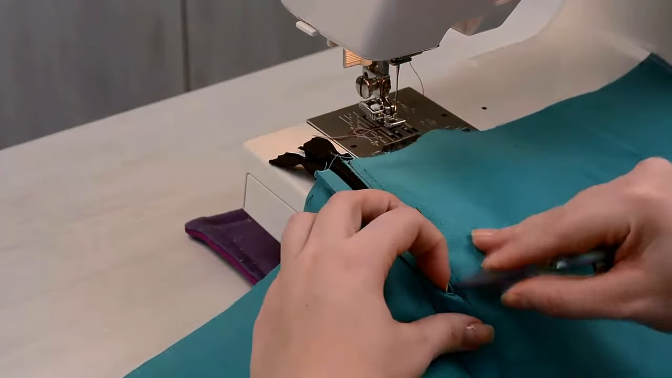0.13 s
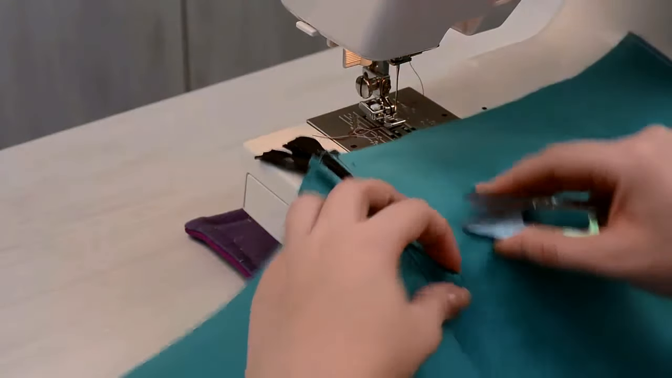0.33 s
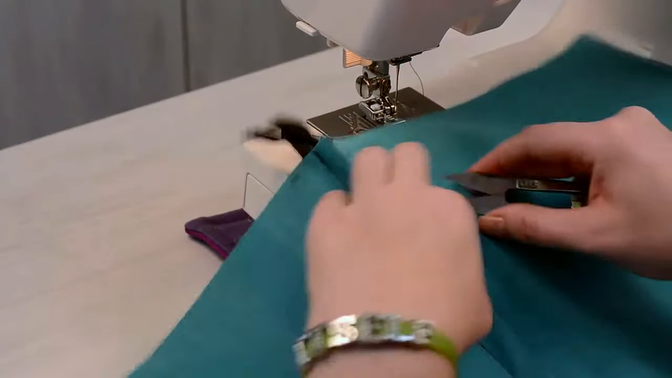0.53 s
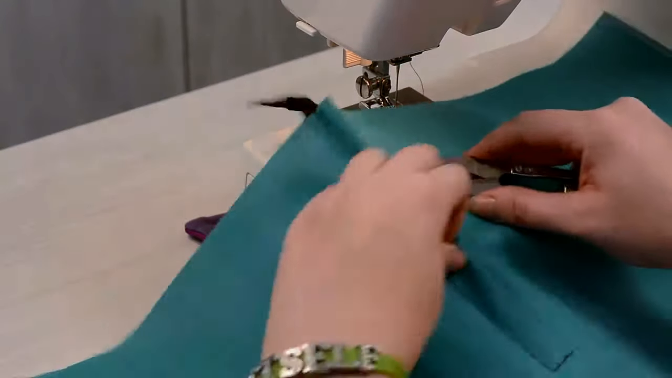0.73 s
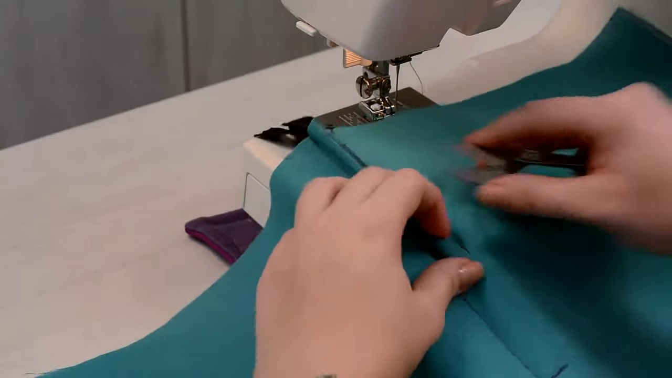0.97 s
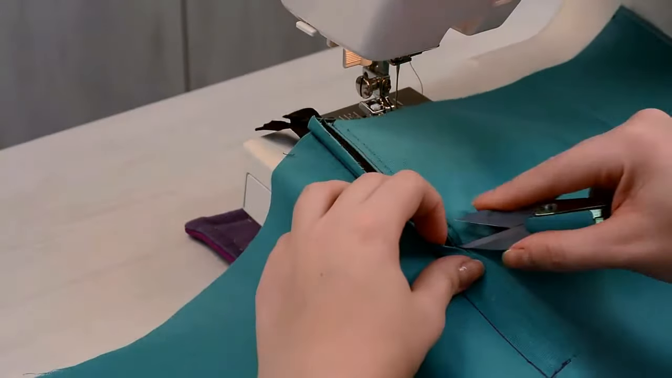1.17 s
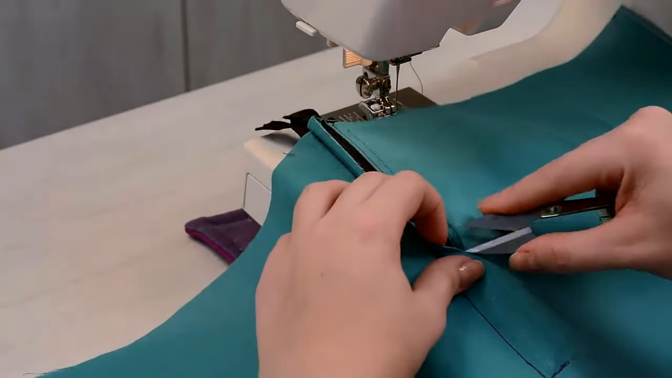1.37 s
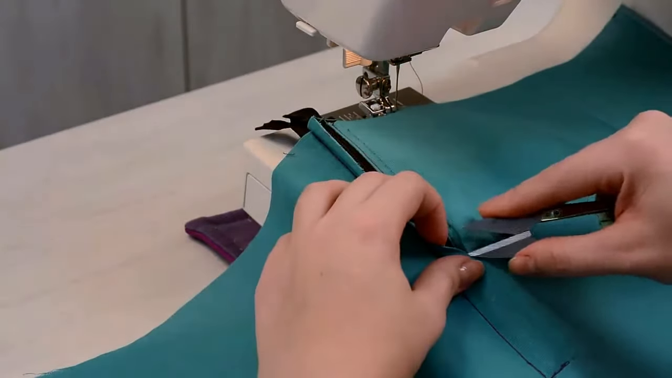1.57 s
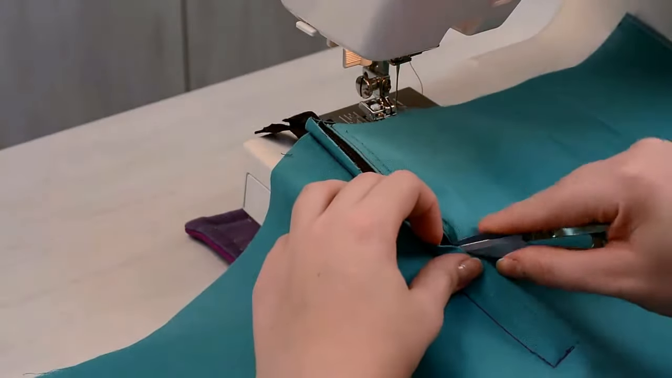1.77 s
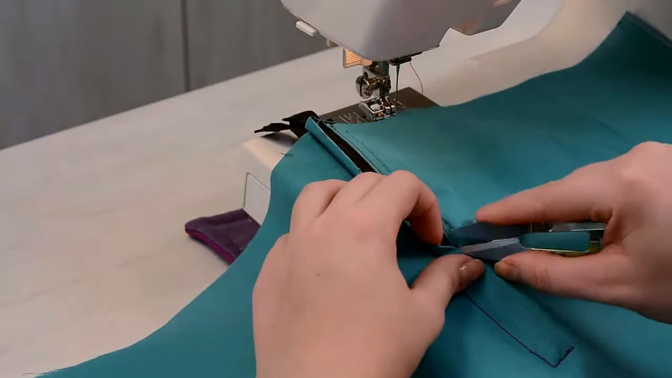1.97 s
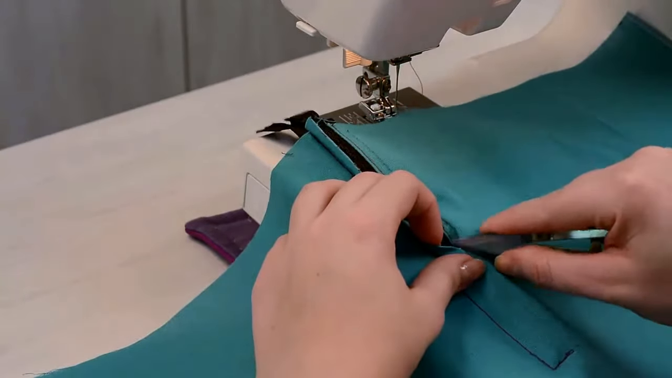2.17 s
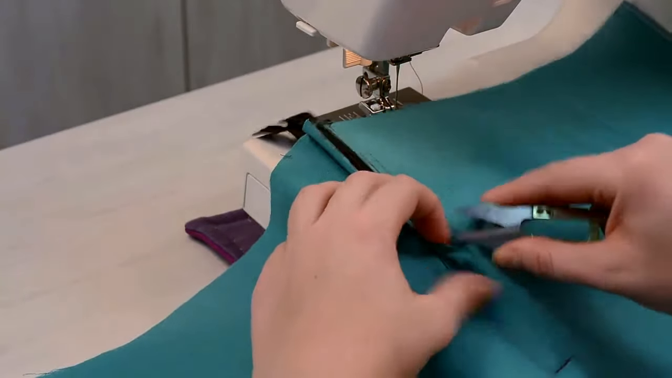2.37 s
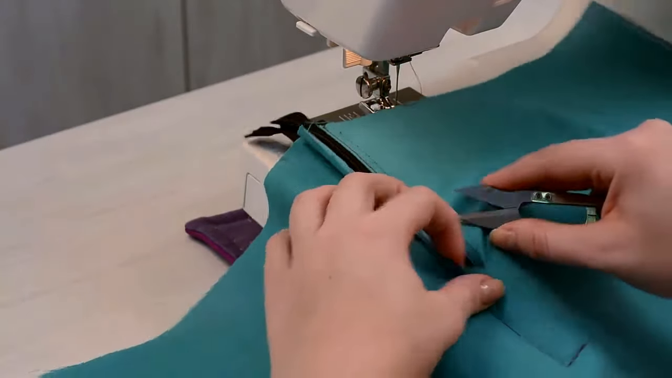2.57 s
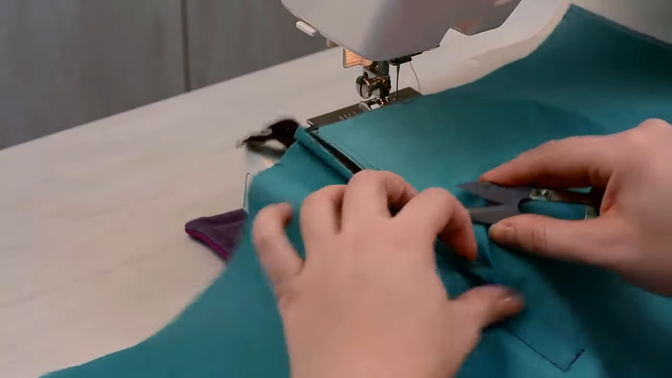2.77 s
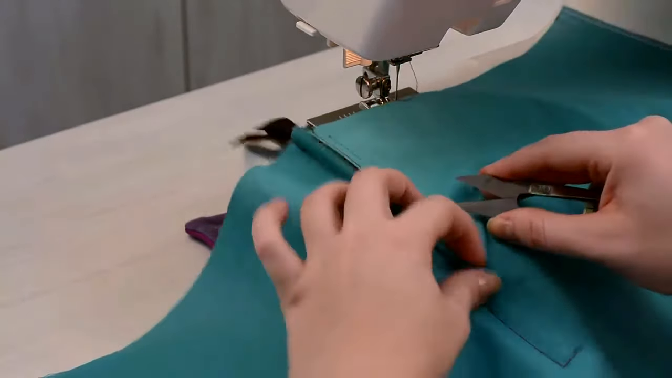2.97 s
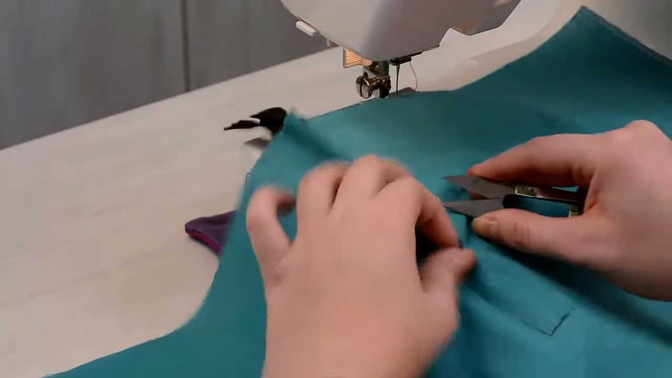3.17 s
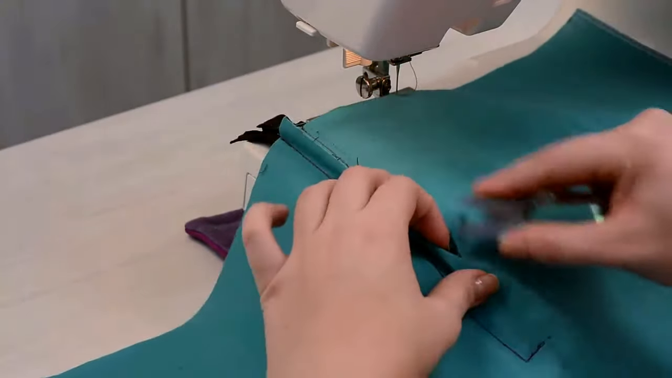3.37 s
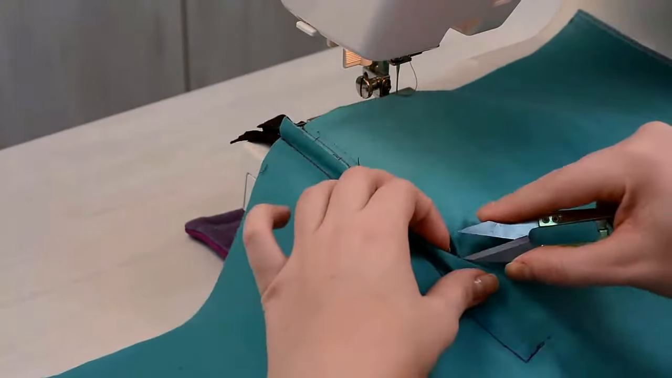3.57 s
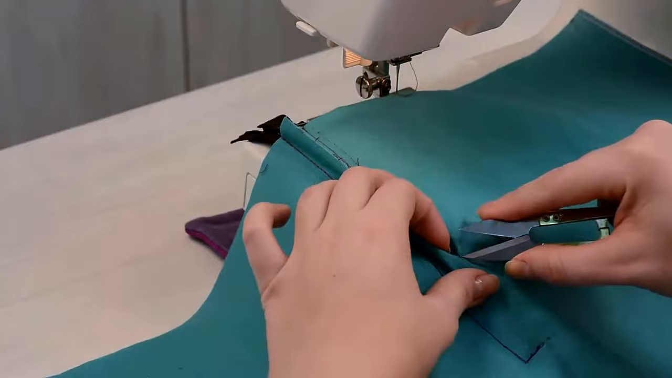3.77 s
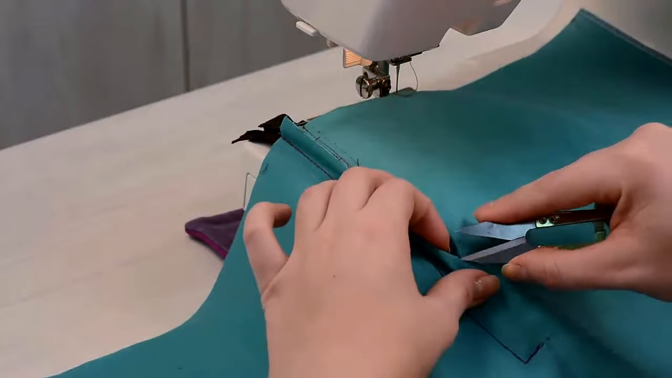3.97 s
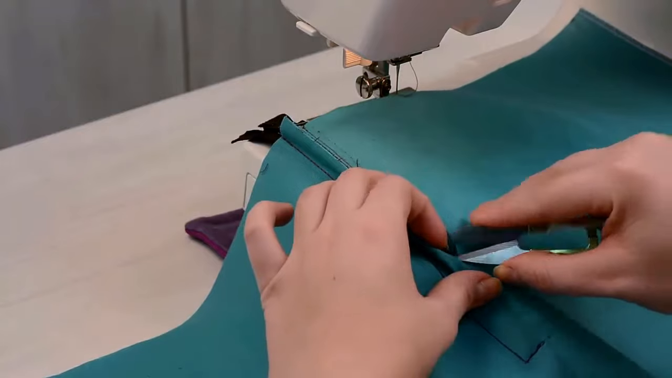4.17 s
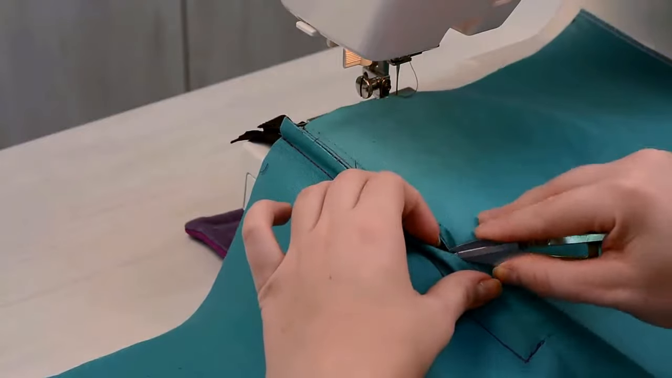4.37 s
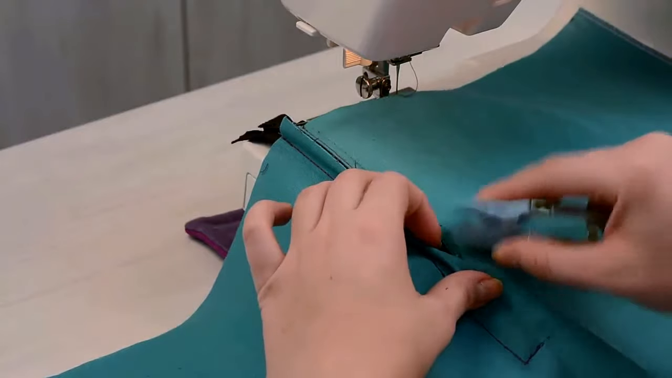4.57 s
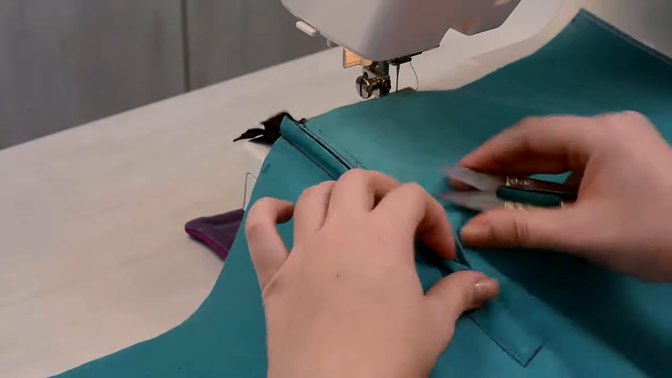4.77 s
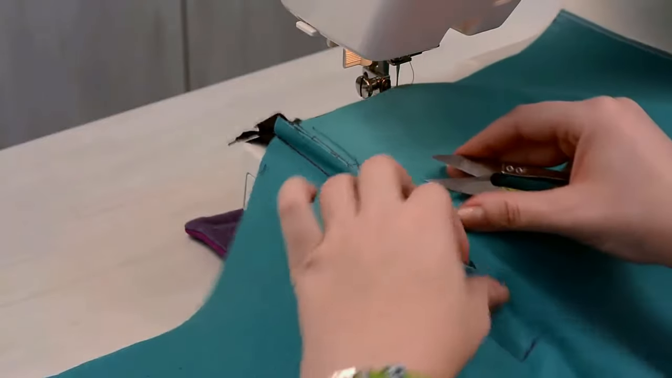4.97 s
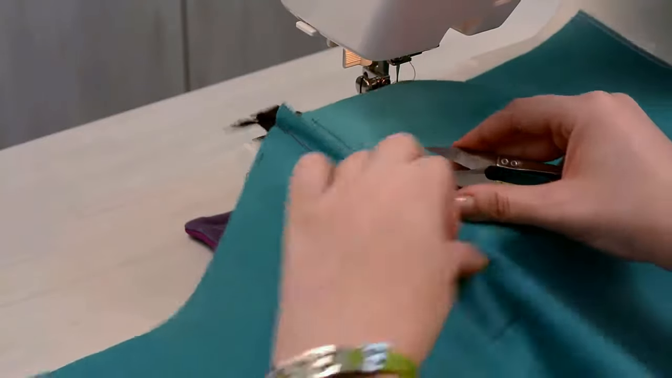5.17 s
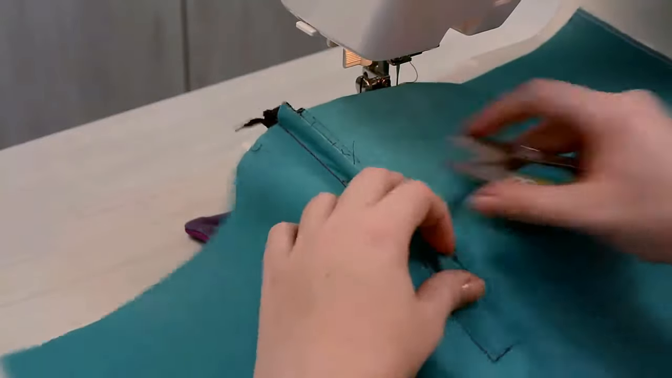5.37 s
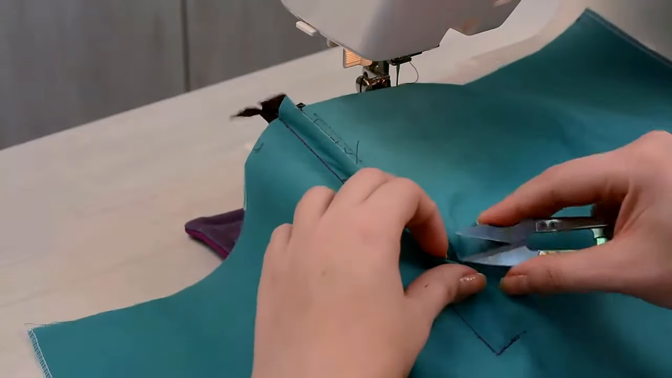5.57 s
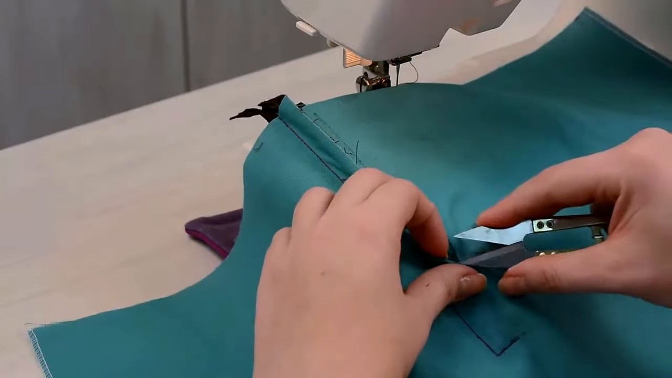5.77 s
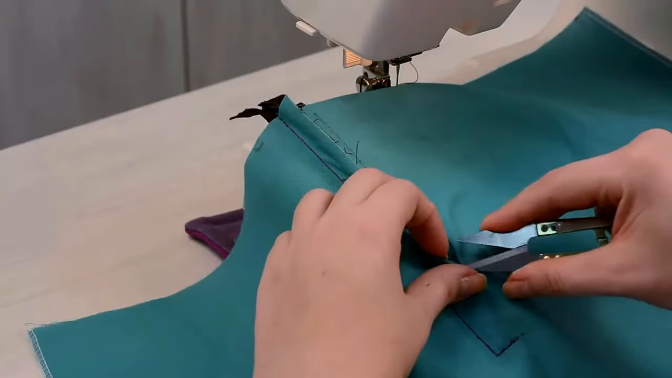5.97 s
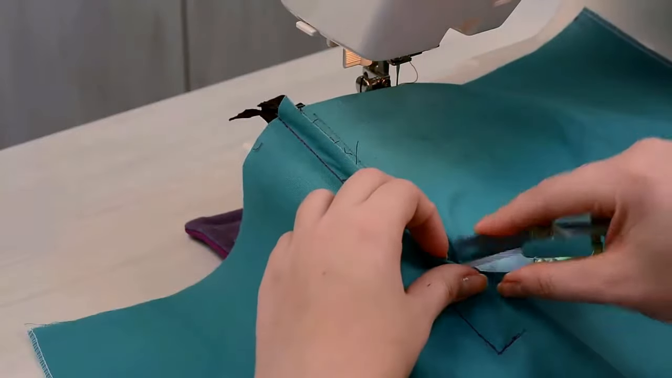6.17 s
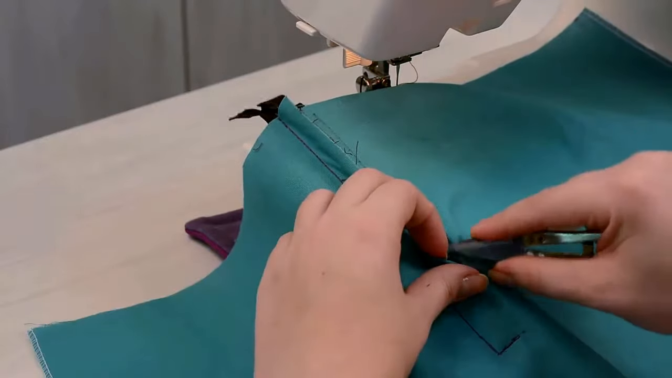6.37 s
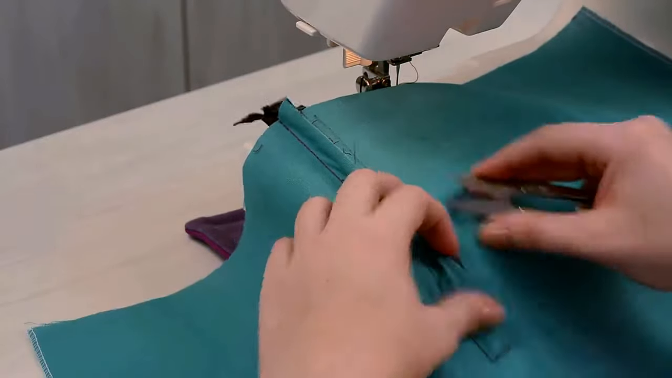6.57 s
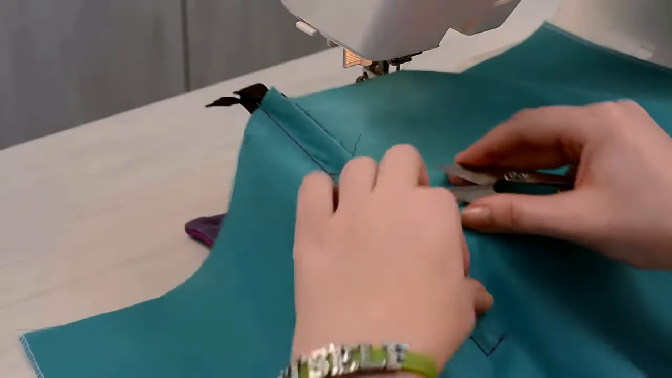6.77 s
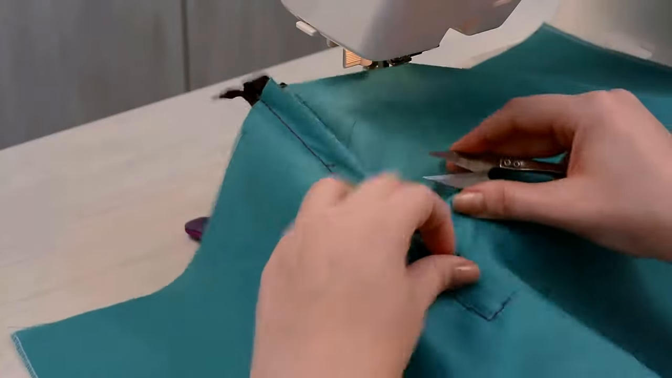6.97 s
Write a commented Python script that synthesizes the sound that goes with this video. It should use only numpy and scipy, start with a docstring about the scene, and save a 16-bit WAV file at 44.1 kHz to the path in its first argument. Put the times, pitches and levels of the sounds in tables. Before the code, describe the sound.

Fabric rustles and slides over a table with soft finger knocks, broken by a few sharp metallic clicks of little spring snips.

```python
"""At a sewing table, the microphone close to a pair of spring thread snips, everything straight ahead.
The steel blades scrape shut and clack, then rasp open with sharp catches, ringing with their handle.
Fingers and cloth drag, scuff and knock on the hollow table top, and the weave rustles and swishes.
Behind them lie short room reflections, a low murmur, faint mains hum and microphone hiss."""
import sys
import numpy as np
from scipy import signal
from scipy.fft import rfft, irfft
from scipy.io import wavfile
from scipy.ndimage import uniform_filter1d

SR = 44100
rng = np.random.default_rng(int(sys.argv[2]) if len(sys.argv) > 2 else 0)


def unload_audio(sound):
    """Save the sound as a 16-bit wav file, at the path given as the first command line argument."""
    columns = np.transpose(np.atleast_2d(sound))
    # keep every value between -1 and 1, then stretch to whole-number steps
    steps = np.round(np.clip(columns, -1, 1) * 32767)
    wavfile.write(sys.argv[1], SR, steps.astype(np.int16))


N = 310023
T = np.arange(N) / SR

# Modes of the hollow table top. Each row: frequency in Hz, width in Hz, gain in dB.
TOP_MODES = [(298.4, 24, 1.5), (340.4, 50, 4), (460, 72, -2), (536, 51, 3.5), (614, 22, 0.5), (816, 45, -2),
             (1356, 59, -21), (1524, 194, -15), (1846, 220, -19.5), (2296, 260, -19.5), (2870, 1800, -33.5)]
UPPER_MODES = [mode for mode in TOP_MODES if mode[0] >= 1000]


def undb(db):
    """Decibels to gain."""
    return 10 ** (np.asarray(db) / 20)


def unit(x):
    """Scale to rms 1."""
    return x / np.sqrt(np.mean(x ** 2))


def ring(x, modes):
    """Sum of two-pole resonances, each given as centre in Hz, width in Hz, gain in dB."""
    return sum(undb(db) * signal.lfilter(*signal.iirpeak(hz, hz / width, fs=SR), x)
               for hz, width, db in modes)


def spectrum(points):
    """Gain of a curve of (Hz, dB) points on the bins of the whole sound."""
    hz, db = np.transpose(points)
    return undb(np.interp(np.log(np.fft.rfftfreq(N, 1 / SR) + 1), np.log(hz), db))


def grains(spread_db, size=N):
    """Noise whose samples have heavy-tailed sizes: a dense crackle."""
    return unit(rng.standard_normal(size) * undb(spread_db * rng.exponential(size=size)))


def wander(rate_hz):
    """Glides between random levels, rate_hz of them a second; spread near 1."""
    hold = int(SR / rate_hz)
    return uniform_filter1d(np.repeat(rng.standard_normal(N // hold + 1), hold), hold)[:N]


def add(out, start_s, sound, peak_db):
    """Mix a short sound in with the given peak."""
    i = int(start_s * SR)
    part = sound[:N - i]
    out[i:i + len(part)] += part * undb(peak_db) / np.abs(sound).max()


def noise_floor():
    """Room murmur and mains hum in the centre; microphone hiss above, wider toward the treble."""
    # Murmur and hiss. Each row: frequency in Hz, relative density in dB.
    floor_curve = [(12, -36), (20, 2.5), (163, -2.5), (410, -8), (459, -18), (542, -11), (1060, -16),
                   (1610, -14.5), (1860, -15.5), (2260, -16.5), (4060, -18), (14700, -22), (16000, -25.5)]
    # The part that differs between left and right. Each row: frequency in Hz, share in dB.
    side_curve = [(30, -28), (60, -29), (110, -24), (200, -24), (380, -18.5), (700, -11), (1290, -8.5),
                  (2380, -10), (4400, -6), (8120, -4), (15000, -1)]
    floor_db, hum_db, hum_hz = -49.5, -66, 51.5
    mid, side = rfft(rng.standard_normal((2, N))) * spectrum(floor_curve)
    mid, side = irfft(mid, N), irfft(side * spectrum(side_curve), N)
    hum = undb(hum_db) * np.sqrt(2) * np.sin(2 * np.pi * hum_hz * T)
    return undb(floor_db) * (mid + side * np.array([[1], [-1]])) / np.std(mid) + hum


def room(x):
    """A short dull tail of reflections, almost the same left and right."""
    t60_s, mid_db, side_db = 0.1, -20.2, -59.6
    t = T[:int(.2 * SR)]
    tails = rng.standard_normal((2, len(t))) * np.exp(-np.log(1000) * t / t60_s) * (t > .003)
    tails = signal.lfilter([1], [1, -.5], tails)
    mid, side = tails / np.sqrt(np.sum(tails ** 2, axis=1, keepdims=True))
    response = undb(mid_db) * mid + undb(side_db) * side * np.array([[1], [-1]])
    return signal.fftconvolve(x[None], response, axes=1)[:, :N]


def weave(grain_db, flicker_db, flicker_hz):
    """Fine crackle of fibres as a spectrum; each third-octave flickers alone, shifting the colour."""
    # Colour of the cloth. Each row: frequency in Hz, gain in dB.
    cloth_curve = [(590, -6), (1000, -16), (1150, -14), (2330, -10), (3890, -13), (4900, -5), (5900, -9.5),
                   (6860, -5.5), (13600, -2.5), (16000, 2)]
    fibres = grains(grain_db) * undb(flicker_db * wander(flicker_hz))
    centres_hz = 1000 * 2 ** np.arange(0, 4.1, 1 / 3)
    bands = sum(undb(4.3 * wander(25)) * ring(fibres, [(hz, hz / 5, 0)]) for hz in centres_hz)
    return rfft(bands) * spectrum(cloth_curve)


def spot_modes(spot_hz, focus_db):
    """Low table modes as excited at one spot: those near its pitch are favoured."""
    return [(hz, width, db - focus_db * np.log2(hz / spot_hz) ** 2)
            for hz, width, db in TOP_MODES if hz < 1000]


def soft_touch(x):
    """Flesh and cloth pass little treble into the wood, and the small top radiates little bass."""
    return signal.sosfilt(signal.butter(2, [240., 900.], "band", fs=SR, output="sos"), x)


def finger_rubs():
    """Decibels by which fingers rubbing along the table lift its rumble."""
    # Each row: start in seconds, length in seconds, lift in dB.
    rubs = [(0.187, 0.099, 2), (.72, 0.091, 2), (.93, .07, 8), (1.09, 0.042, 6), (1.33, 0.053, 8.5),
            (1.536, 0.19, 6), (1.884, .06, 9), (1.968, 0.13, 12), (2.36, 0.092, 7), (3.382, 0.12, 6.5),
            (4.076, .14, 8), (4.6, 0.12, 5), (4.78, .06, 9), (5.098, 0.045, 6.5), (5.24, 0.057, 5),
            (5.842, 0.069, 7.5), (6.076, 0.14, 5.5), (6.767, 0.03, 5)]
    edge_s = 0.017
    return sum(db * np.clip(np.minimum(T - s, s + length_s - T) / edge_s, 0, 1)
               for s, length_s, db in rubs)


def cloth_drag():
    """Stick-slip of cloth shakes the table in short throbs and rustles in fine grains."""
    # Hands resting and shifting. Each row: time in seconds, rumble before rubs in dB, rustle in dB.
    hand_levels = [(0.0, -46, -49), (0.23, -43, -48.5), (1.35, -54, -53.5), (1.57, -51, -54),
                   (1.74, -56, -53.5), (2.29, -50.5, -52), (2.54, -45, -48), (2.88, -49.5, -47.5),
                   (3.68, -58.5, -54.5), (4.31, -49, -53), (4.6, -53.5, -52.5), (4.93, -47, -46.5),
                   (5.33, -47, -52.5), (5.52, -54, -54.5), (5.91, -53, -53), (6.48, -48.5, -51.5),
                   (6.62, -47, -48.5), (7.03, -47.5, -47)]
    times, *levels = np.transpose(hand_levels)
    rumble_db, rustle_db = (np.interp(T, times, db) for db in levels)
    palm_hz = 520 * np.exp(0.13 * wander(10))  # the spot under the hands strays in pitch
    shake = grains(1.85) * undb(3.15 * wander(45))
    low = sum(undb(db + 2 * wander(16)) * ring(shake, [(hz, width, 0)])
              for hz, width, db in spot_modes(palm_hz, focus_db=14))
    rumble = soft_touch(low) + undb(-0.5) * ring(shake, UPPER_MODES)
    rustle = unit(irfft(weave(grain_db=2.46, flicker_db=1.6, flicker_hz=90), N))
    return unit(rumble) * undb(rumble_db + finger_rubs()) + rustle * undb(rustle_db)


def cloth_swishes():
    """Cloth strokes cloth, starting quickly and trailing off; brighter strokes have more top octave."""
    # Each row: start in seconds, length in seconds, level in dB, brightness in dB.
    strokes = [(0.121, 0.041, -31, -10), (0.165, 0.18, -38.5, -9), (0.289, 0.019, -35, 2),
               (0.34, 0.099, -46, -6), (0.746, 0.058, -41, -2), (0.812, 0.18, -41, 2.5),
               (2.342, 0.13, -42.5, -2), (2.722, 0.13, -42.5, -10), (2.84, 0.018, -36, 2),
               (2.89, 0.081, -43, -3), (3.172, 0.051, -42, 3), (3.204, 0.038, -35, -4),
               (3.28, 0.054, -44, 1), (4.72, 0.05, -43.5, -2), (4.764, 0.051, -37.5, -2),
               (4.809, 0.065, -40, 0), (4.939, 0.011, -37, 0), (4.979, 0.033, -47, 2),
               (5.045, 0.11, -42, 2), (5.204, .02, -41.5, -7), (5.225, 0.13, -46, -3), (5.32, .02, -48, 0),
               (5.414, 0.033, -42, -18), (6.474, 0.14, -45, 0), (6.607, 0.096, -45.5, -9),
               (6.727, 0.11, -43, -2)]
    cloth = weave(grain_db=2.6, flicker_db=2.6, flicker_hz=160)
    whole = irfft(cloth, N)
    treble = irfft(cloth * spectrum([(5000, -24), (9000, -6.5)]), N)
    out = np.zeros(N)
    for s, length_s, db, bright_db in strokes:
        i, n = int(s * SR), int(length_s * SR)
        progress = np.linspace(0, 1, n)
        envelope = np.minimum(progress / 0.052, 1) * np.minimum((1 - progress) / 0.5, 1)
        out[i:i + n] += undb(db) * envelope * (whole + (undb(bright_db) - 1) * treble)[i:i + n]
    return out / np.std(whole)


def table_knocks():
    """A finger or fold presses on the top, then skids on; harder contacts wake the upper modes."""
    # Each row: start in seconds, peak in dB, pitch of the spot struck in Hz, scuff decay in seconds.
    contacts = [(.11, -16.5, 734, 0.0095), (.266, -21.5, 530, 0.0084), (.293, -18, 526, .016),
                (.304, -19, 580, .006), (.315, -23, 560, 0.0056), (.522, -26.5, 387, .01),
                (.703, -24.5, 630, .014), (.75, -29, 439, 0.03), (.859, -24.5, 544, 0.021),
                (.881, -22.5, 326, .012), (.896, -21.5, 342, 0.028), (.929, -26, 503, 0.01),
                (1.129, -32.5, 554, 0.0078), (1.215, -25.5, 560, 0.0085), (1.39, -21.5, 650, .008),
                (1.587, -29, 545, 0.0096), (1.726, -34.5, 337, 0.0091), (1.904, -33.5, 557, .01),
                (2.031, -33, 540, .012), (2.144, -22.5, 330, 0.0073), (2.315, -31, 549, .009),
                (2.382, -31.5, 304, 0.037), (2.434, -31, 441, 0.011), (2.497, -24.5, 573, 0.013),
                (2.529, -31, 275, 0.024), (2.621, -27.5, 560, 0.012), (2.847, -22.5, 547, 0.011),
                (2.907, -30.5, 530, .035), (3.154, -23, 600, 0.013), (3.209, -21, 564, 0.0074),
                (3.227, -31.5, 610, 0.015), (3.283, -33.5, 580, 0.015), (3.741, -35, 552, 0.026),
                (4.236, -28, 537, 0.017), (4.367, -29.5, 325, 0.012), (4.734, -29, 455, 0.038),
                (4.777, -25.5, 552, 0.029), (4.923, -27, 357, 0.0073), (4.941, -26, 630, 0.0089),
                (5.056, -17, 680, 0.014), (5.109, -30, 646, 0.012), (5.18, -33.5, 633, 0.016),
                (5.206, -26.5, 332, 0.012), (5.258, -32.5, 490, 0.019), (5.318, -25.5, 443, .007),
                (5.386, -33.5, 533, 0.026), (5.481, -28, 546, 0.019), (5.53, -28, 530, 0.0074),
                (5.728, -36, 450, 0.016), (6.116, -37.5, 455, .011), (6.143, -33, 570, 0.015),
                (6.178, -25.5, 530, 0.013), (6.218, -25, 315, .008), (6.477, -33.5, 371, .008),
                (6.554, -21.5, 520, .011), (6.617, -35, 581, 0.016), (6.655, -26, 527, 0.011),
                (6.735, -28, 633, .015), (6.76, -24.5, 567, 0.016), (6.915, -22.5, 450, 0.011),
                (6.939, -28.5, 291, 0.014), (6.99, -20, 470, 0.0084)]
    rise_s = .0018
    out, t = np.zeros(N), T[:5000]
    rise = 1 - np.exp(-t / rise_s)
    for s, db, spot_hz, scuff_s in contacts:
        push = rng.standard_normal(len(t)) * rise * np.exp(-t / scuff_s)
        push[int(rise_s * SR)] += 8  # the first blow
        # the hand loads the top differently each time, shifting the modes a little
        low_modes = [(hz * rng.normal(1, 0.021), width, rng.normal(gain_db, 2))
                     for hz, width, gain_db in spot_modes(spot_hz, focus_db=16)]
        thud = soft_touch(ring(push, low_modes))
        hardness = undb(rng.normal(-7, 4))
        scuff = ring(push * grains(1.95, size=len(t)), UPPER_MODES)
        add(out, s, thud + hardness * scuff, db)
    return out


def ticks():
    """Nails, thread and metal give lone dry cracks, each broad around its centre."""
    # Each row: start in seconds, peak in dB, centre in Hz.
    cracks = [(0.1076, -21, 1580), (0.2941, -15.5, 1560), (0.522, -24.5, 1620), (0.8605, -30, 2360),
              (1.2145, -21.5, 4520), (1.386, -18, 10600), (1.3935, -14, 10800), (1.6204, -29, 11600),
              (2.4957, -23, 5220), (2.621, -30, 1820), (2.8478, -28, 7660), (2.9354, -23, 8060),
              (3.058, -33, 12000), (3.2074, -11.5, 7960), (3.2234, -20, 6800), (4.312, -29.5, 11000),
              (4.8347, -30, 1500), (4.9403, -29, 2430), (5.0584, -27, 1850), (5.206, -27, 14000),
              (5.2802, -26, 8050), (6.1785, -19.5, 5360), (6.646, -33, 2260), (6.711, -32, 10300),
              (6.9125, -22.5, 1460)]
    decay_s = 0.00085
    out, t = np.zeros(N), T[:500]
    for s, db, hz in cracks:
        burst = rng.standard_normal(len(t)) * np.exp(-t / decay_s)
        add(out, s, ring(burst, [(hz, .5 * hz, 0), (6000, 14000, -12)]), db)
    return out


def steel(edge_force, handle_force):
    """Blades ring high and short, a little differently with each grip; the sprung handle rings lower."""
    # Modes of the blades and of the handle. Each row: frequency in Hz, width in Hz, gain in dB.
    blade_modes = [(4510, 120, -9.5), (5320, 200, -6), (6740, 240, -6.5), (8020, 500, -11),
                   (8800, 1400, -14.5), (10400, 500, -23), (11430, 440, 3.5), (11660, 1330, 0.5),
                   (12900, 720, -4.5), (14200, 480, -20), (14900, 500, -21)]
    handle_modes = [(2730, 32, -1), (2884, 300, 4), (2950, 660, -11)]
    gripped = [(hz * rng.normal(1, 0.0088), width, rng.normal(db, 4.1)) for hz, width, db in blade_modes]
    blades = signal.sosfilt(signal.butter(2, 4000., "high", fs=SR, output="sos"), ring(edge_force, gripped))
    handle = ring(handle_force, handle_modes)
    return blades + ring(handle, [(3050, 1120, 0)])  # steepens the sides of the handle resonance


def blade_clacks_and_catches():
    """After a brief chatter of the edges, the blades clack shut, or catch sharply while rasping open."""
    # Each row: impact time in seconds, peak in dB, run-up in seconds, handle share in dB.
    impacts = [(.132, -14.5, 0.001, -20), (2.147, 1, 0.003, 0), (2.3336, -10, 0.0013, -11),
               (4.3698, 2.5, 0.0029, -1.5), (4.51, -11, 0.00167, -22), (6.3023, -10, 0.004, -11),
               (6.455, -10.5, 0.00078, -25)]
    out = np.zeros(N)
    for s, db, run_s, handle_db in impacts:
        impact = int(run_s * SR)
        force = np.zeros(impact + 2000)
        force[:impact] = 0.25 * grains(4.7, size=impact) * np.linspace(.5, 1, impact)
        force[impact:impact + 80] = rng.standard_normal(80) * np.exp(-T[:80] / .0007)
        blow = 0.49 * force
        blow[impact] += 4  # the handle takes one sharp blow
        contact_crack = ring(force, [(4430, 3800, -21)])
        add(out, s - run_s, steel(force, undb(handle_db) * blow) + contact_crack, db)
    return out


def blade_rasps():
    """The edges rasp along each other in uneven slips that ring the steel."""
    # Each row: start in seconds, length in seconds, friction level in dB, handle share in dB.
    rasps = [(0.13, 0.018, -23.5, -26), (1.627, 0.085, -44.5, 0), (1.889, 0.038, -43, 3.5),
             (1.98, .07, -54, -14), (2.318, 0.024, -20.5, -17), (4.155, 0.12, -50, -3),
             (4.501, 0.018, -16.5, -14.5), (6.203, 0.007, -37, -5), (6.212, 0.011, -30, -2.5),
             (6.234, 0.0089, -37.5, 5), (6.313, 0.0059, -34, -3), (6.441, 0.023, -18.5, -16),
             (6.46, 0.015, -38.5, 4.5), (0.144, 0.015, -40, 6)]
    out = np.zeros(N)
    slips = np.maximum(wander(1300) + .5, .15) ** 0.25  # catches about a millisecond long
    for s, length_s, db, handle_db in rasps:
        i, n = int(s * SR), int(length_s * SR)
        friction = unit(grains(0.9, size=n) * slips[i:i + n]) * signal.windows.tukey(n, .45)
        force = np.pad(undb(db) * friction, (0, 2000))
        out[i:i + len(force)] += steel(force, undb(handle_db) * force)
    return out


def scene():
    """Table, cloth and snips close up and centred, with the room and noise floor behind."""
    near = table_knocks() + ticks() + cloth_drag() + cloth_swishes()
    near += blade_clacks_and_catches() + blade_rasps()
    return near + room(near) + noise_floor()


def record(dry):
    """The loudest peaks clip a little under full scale; the top is cut steeply."""
    ceiling, stop_hz = .88, 16350
    lowpass = signal.cheby2(16, 80, stop_hz, fs=SR, output="sos")
    return signal.sosfilt(lowpass, np.clip(dry, -ceiling, ceiling))


dry = scene()
out = record(dry)
unload_audio(out)
```